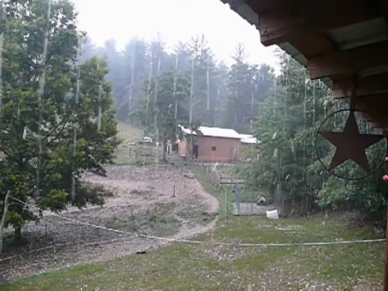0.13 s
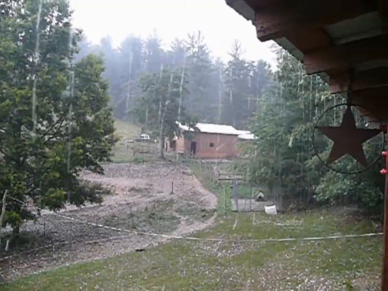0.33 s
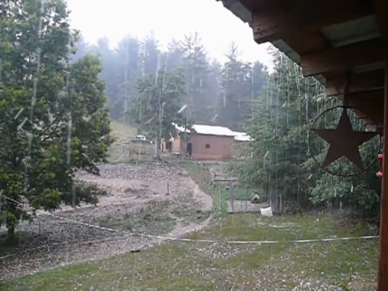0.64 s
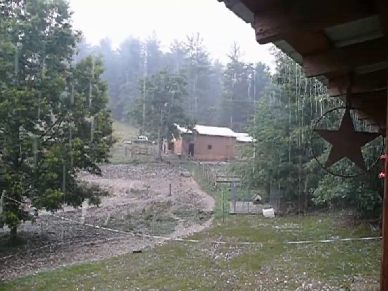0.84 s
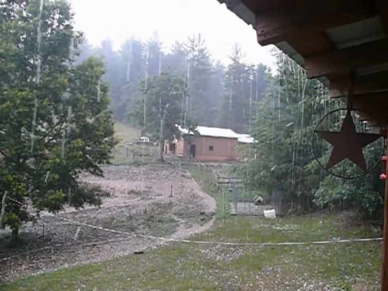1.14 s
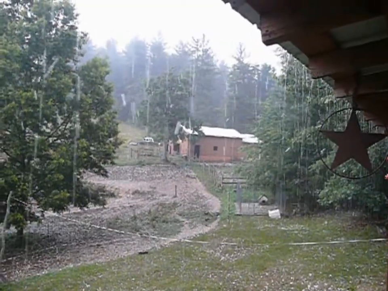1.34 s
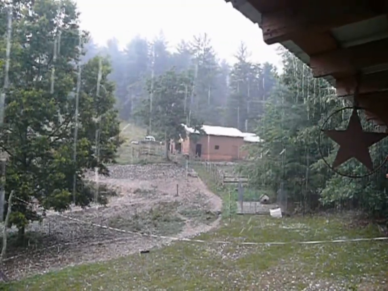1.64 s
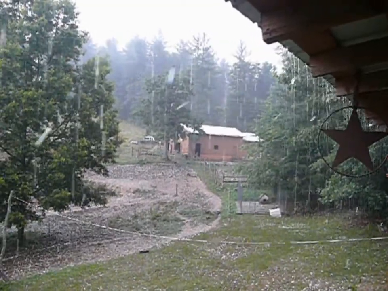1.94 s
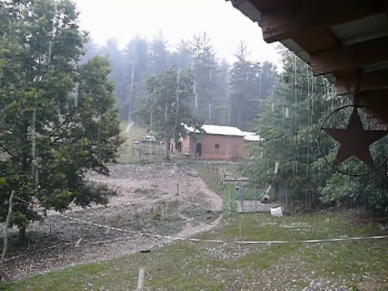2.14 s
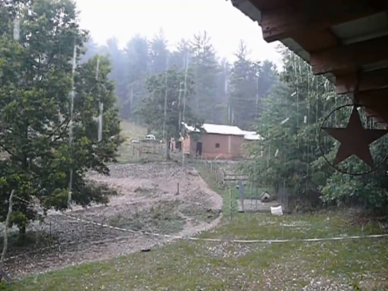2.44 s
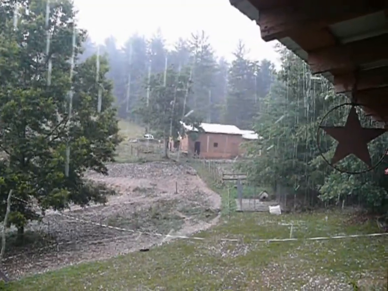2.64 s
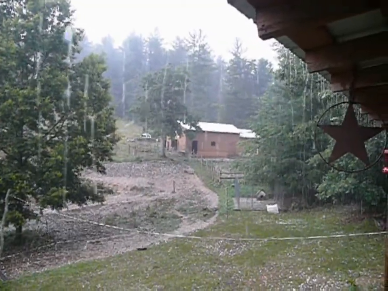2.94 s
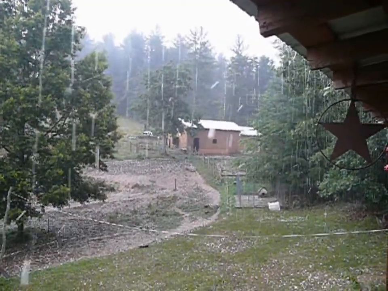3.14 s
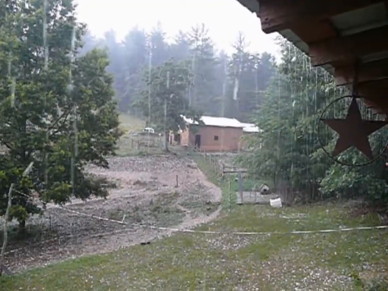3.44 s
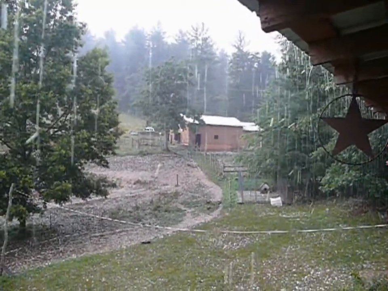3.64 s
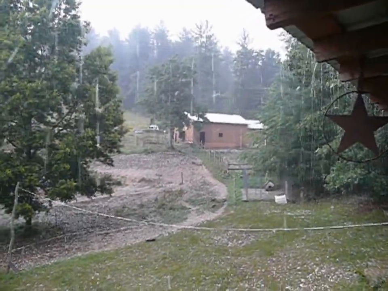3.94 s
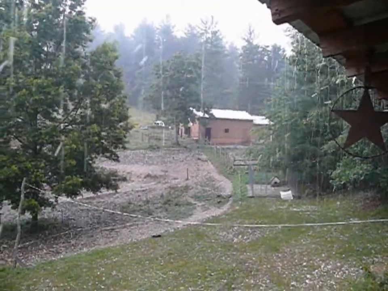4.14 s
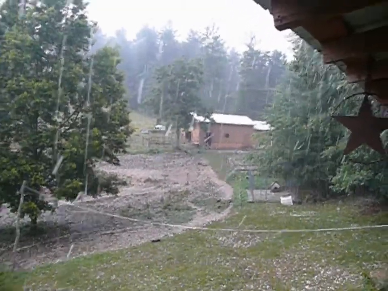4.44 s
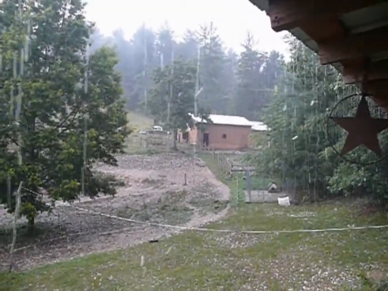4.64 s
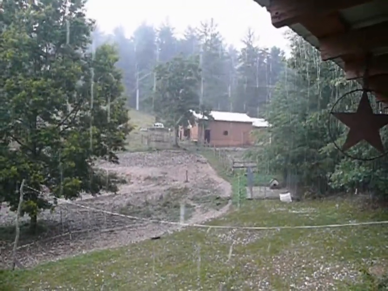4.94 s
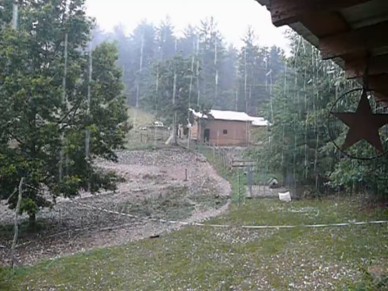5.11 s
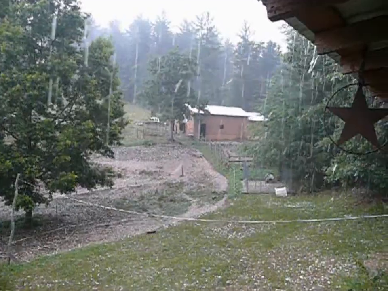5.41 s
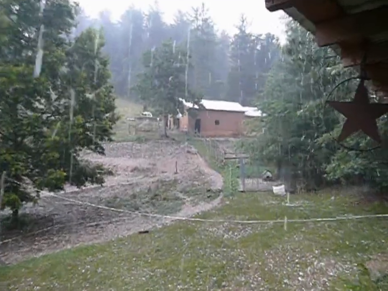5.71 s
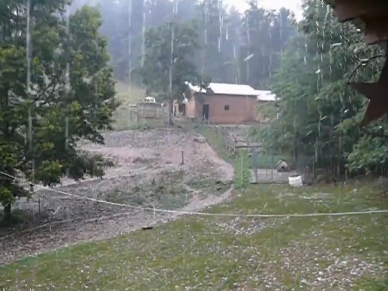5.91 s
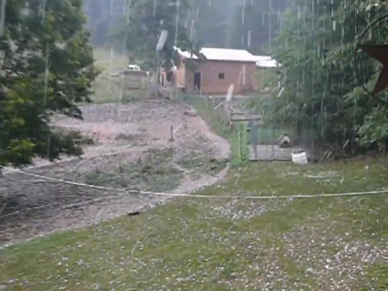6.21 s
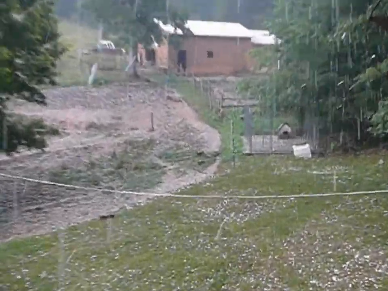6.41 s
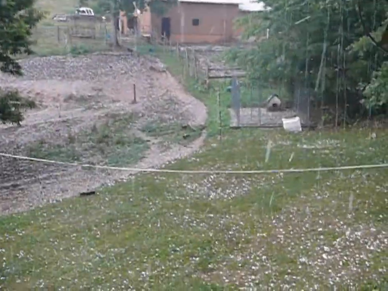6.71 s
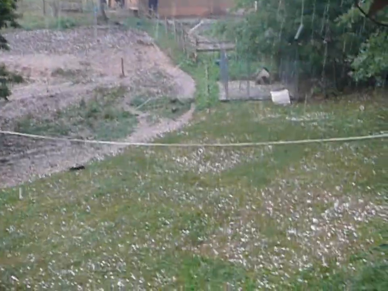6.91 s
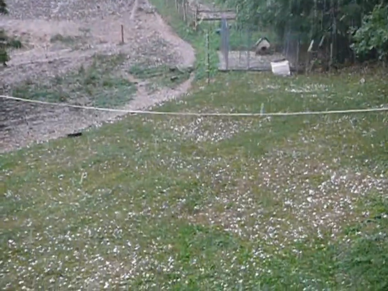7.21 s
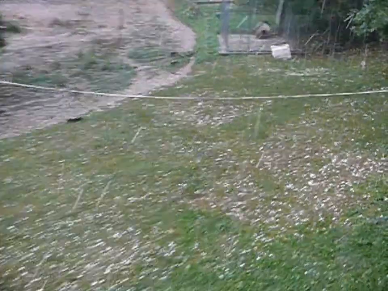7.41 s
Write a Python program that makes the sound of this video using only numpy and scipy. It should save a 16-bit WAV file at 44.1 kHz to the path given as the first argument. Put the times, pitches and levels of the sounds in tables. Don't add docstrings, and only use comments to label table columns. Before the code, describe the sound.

Large hailstones hammer a sheet-metal porch roof in a dense, irregular clatter of cracks, rattles and knocks over hissing rain, heard close and gritty.

```python
import sys
import numpy as np
from scipy import signal
from scipy.fft import rfft, irfft, next_fast_len
from scipy.io import wavfile
from scipy.ndimage import uniform_filter1d

SR = 44100
rng = np.random.default_rng(int(sys.argv[2]) if len(sys.argv) > 2 else 0)


def nominal_scale(level):
    x = np.asarray(level, float) / 20
    return 10 ** x


def pcm_store(signal):
    levels = np.round(np.clip(np.atleast_2d(signal), -1, 1) * 32767)
    wavfile.write(sys.argv[1], SR, levels.astype(np.int16).T)


N = 333396

# start_s, peak_db, ring_s
NEAR_SHEET_BLOWS = [(.288, -14, .38), (.377, -33, 0.12), (.523, -23.5, 0.34), (1.146, -10, 0.37),
                    (1.39, -27.5, 0.4), (2.539, -16.5, 0.12), (2.794, -13.5, 0.6), (3.359, -15, 0.14),
                    (3.555, -17.5, 0.93), (3.686, -13, 0.42), (4.219, -21, .25), (4.866, -23, 0.27),
                    (5.62, -17.5, 0.43), (5.835, -24.5, 0.72), (6.59, -17.5, 0.32), (6.932, -18, 0.37)]
# start_s, peak_db, ring_s
NEAR_RAFTER_BLOWS = [(.159, -27, 0.24), (.318, -13, 0.32), (.413, -8, 0.49), (.938, -24.5, 0.13),
                     (1.671, -14.5, 0.58), (2.134, -13.5, 0.39), (2.182, -27, 0.14), (2.361, -12, 0.35),
                     (2.999, -23.5, 0.36), (4.016, -12.5, .31), (4.122, -16.5, 0.48), (4.7, -20, 0.56),
                     (4.989, -24.5, 0.25), (5.537, -7, 0.26), (5.868, -17.5, 0.21), (6.074, -11.5, 0.24),
                     (6.099, -9.5, 0.18), (6.151, -17, 0.15), (6.2, -11.5, 0.32), (6.544, -25, 0.11),
                     (6.986, -17, 0.14)]
# start_s, peak_db, ring_s
FAR_SHEET_BLOWS = [(.096, -23, 0.58), (.442, -14.5, 0.42), (.909, -16, 0.34), (1.05, -20, 0.26),
                   (1.477, -17.5, 0.24), (1.741, -15.5, 0.39), (2.26, -22.5, 0.22), (2.468, -21, .65),
                   (2.868, -14.5, 0.48), (3.068, -17.5, 0.27), (3.58, -23.5, 0.21), (4.276, -23.5, 0.38),
                   (5.072, -11, 0.29), (5.161, -15.5, 0.38), (5.38, -22, 0.26), (6.005, -12.5, 0.2),
                   (6.631, -22, 0.72), (6.829, -21, 0.1), (7.16, -15, 0.26), (7.302, -15.5, 0.23),
                   (7.328, -17, 0.41), (7.359, -21, .2)]
# start_s, peak_db, ring_s
FAR_RAFTER_BLOWS = [(.071, -21, 0.13), (.143, -16.5, 0.2), (.882, -24, 0.15), (1.357, -10.5, 0.38),
                    (1.698, -13.5, 0.23), (1.785, -6, 0.095), (2.238, -13, 0.18), (2.505, -12, 0.3),
                    (2.705, -12, 0.24), (3.711, -14.5, 0.52), (4.5, -9.5, 0.37), (4.604, -19, 0.76),
                    (4.638, -15.5, 0.51), (4.92, -12.5, 0.33), (5.048, -16, 0.6), (5.246, -15, 0.9),
                    (5.682, -17, 0.41), (5.801, -9, 0.38), (6.521, -9, 0.36), (6.729, -21.5, 0.69),
                    (6.795, -8, 0.36), (7.067, -22, .41), (7.275, -16, 0.48), (7.469, -9.5, 0.17)]
# start_s, peak_db, ring_s
EAVES_BLOWS = [(.24, -17.5, 0.42), (1.327, -26, 0.17), (1.604, -24.5, 0.32), (1.854, -33.5, 0.34),
               (2.023, -22.5, 0.24), (2.107, -17, 0.18), (3.034, -24.5, 0.12), (3.19, -14.5, 0.43),
               (3.629, -14.5, 0.23), (3.864, -28, 0.13), (4.1, -33.5, 0.3), (4.419, -17, 0.35),
               (4.829, -31.5, 0.54), (5.331, -16.5, 0.19), (5.468, -16, 0.21), (5.702, -15, 0.26),
               (5.754, -17.5, .43), (5.928, -26, 0.73), (6.474, -17, 0.12), (7.138, -32, 0.26)]
# start_s, peak_db, ring_s
WIDE_PANEL_BLOWS = [
    (2.563, -14, 0.17),
    (2.592, -13.5, 0.26),
    (3.344, -17.5, .27),
    (3.388, -24.5, 0.19),
    (4.297, -18, 0.3),
    (7.039, -32.5, 0.54),
    (7.534, -13, .48),
]
# frequency_hz, density_db (per Hz)
ROOF_SPECTRUM = [(35, -48), (60, -37), (226, -16.5), (265, -13), (518, -11), (587, -13.5), (1010, -3),
                 (1610, -6), (2330, -4.5), (2640, -7.5), (3260, -5), (3560, -4), (4100, -13), (5330, -52),
                 (9020, -120)]
# frequency_hz, share (of the blow's ring_s)
RING_SHARE = [
    (100, 2.1),
    (400, 0.8),
    (1000, 1.07),
    (2000, .95),
    (3800, 0.83),
]
# start_s, peak_db, pitch_hz
OVERHEAD_KNOCKS = [(0.24, -21, 2340), (0.288, -8, 2260), (0.318, -17, 1037), (0.413, -18, 940),
                   (1.608, -27, 2580), (1.671, -21, 1510), (2.109, -15, 1800), (2.361, -15, 1880),
                   (2.795, -12, 1450), (4.504, -16.5, 2454), (3.188, -13.5, 1800), (3.344, -16, 1195),
                   (3.63, -13, 1350), (3.686, -7, 2033), (3.711, -10, 1028), (4.015, -10, 2500),
                   (4.122, -18, 2290), (4.419, -20, 1107), (4.7, -4.5, 2560), (5.538, -8.5, 1775),
                   (5.753, -9.5, 3085), (6.076, -12.5, 1697), (6.2, -14.5, 1097), (6.521, -13, 1058),
                   (6.73, -9, 2320), (7.535, -19, 3070)]
# start_s, peak_db, pitch_hz
HEAVIEST_KNOCK = [
    (1.1464, 1.5, 880),
]
# centre_s, depth_db
LOW_DIPS = [
    (.2955, -33),
    (.4162, -28),
    (1.1505, -18),
    (2.115, -32),
    (3.26, -37),
    (3.695, -31),
    (4.0185, -39),
    (4.703, -24),
    (6.0765, -28),
]
# start_s, level_db
PATTER_LEVEL = [(0.0, -31.5), (0.12, -36.5), (0.35, -28), (0.55, -38), (0.85, -34), (2.06, -32),
                (2.72, -29.5), (3.33, -33), (3.7, -30.5), (3.83, -40.5), (4.1, -33.5), (4.57, -32),
                (5.0, -34), (5.582, -29), (5.69, -34.5), (6.08, -27), (6.3, -31.5), (7.56, -30)]
# frequency_hz, density_db (per Hz)
LAWN_SPECTRUM = [(35, -57.5), (60, -26), (260, -6.5), (576, -7.5), (997, -1.5), (1550, -3), (2290, -3),
                 (2640, -5), (3380, -2), (4100, -9.5), (5330, -48), (9020, -120)]

SHEET_BASS_DB, RAFTER_BASS_DB, EAVES_BASS_DB, WIDE_BASS_DB = 5, -4, 0, 10
SHEET_TREBLE_DB, RAFTER_TREBLE_DB, EAVES_TREBLE_DB = 1.8, -0.85, 5.5
NEAR_CRACK_DB, FAR_CRACK_DB, EAVES_CRACK_DB, WIDE_CRACK_DB = 6, -4.5, 2.5, -1.2
USUAL_DB, DULLER = -17, 0.34
KNOCK_T60_S, RING_T60_S, RING_UNDER_DB = 0.017, 0.17, -19.5
BEND, BEND_S = 0.28, 0.0023
CAMERA_HZ, TOP_HZ = 8000, 15760
CLIP, STEP, OFFSET = 0.29, 0.005316, 0.0139


def stones():
    spots = [(NEAR_SHEET_BLOWS, SHEET_BASS_DB, SHEET_TREBLE_DB, NEAR_CRACK_DB),
             (NEAR_RAFTER_BLOWS, RAFTER_BASS_DB, RAFTER_TREBLE_DB, NEAR_CRACK_DB),
             (FAR_SHEET_BLOWS, SHEET_BASS_DB, SHEET_TREBLE_DB, FAR_CRACK_DB),
             (FAR_RAFTER_BLOWS, RAFTER_BASS_DB, RAFTER_TREBLE_DB, FAR_CRACK_DB),
             (EAVES_BLOWS, EAVES_BASS_DB, EAVES_TREBLE_DB, EAVES_CRACK_DB),
             (WIDE_PANEL_BLOWS, WIDE_BASS_DB, SHEET_TREBLE_DB, WIDE_CRACK_DB)]
    out = np.zeros(N + SR)
    length = SR * 2 // 5
    for blows, bass_db, treble_db, crack_db in spots:
        for start_s, peak_db, ring_s in blows:
            high_db = treble_db - DULLER * (peak_db - USUAL_DB)
            blow = panel(bass_db, high_db, np.clip(ring_s, 0.05, 0.7), crack_db, length)
            out[round(start_s * SR):][:length] += nominal_scale(peak_db) * blow
    return nominal_scale(5) * coloured(out[:N], ROOF_SPECTRUM)


def panel(low_db, high_db, ring_s, crack_db, length):
    t = np.arange(length) / SR
    hz, frame_s, z = signal.stft(rng.standard_normal((2, length)), SR, nperseg=256)
    tilt_db = along([(120, 0.56 * low_db), (400, low_db), (1200, 0.0035), (3000, high_db)], hz)[:, None]
    modes_db = 2.2 * patches(z[0].shape, bins=3, frames=12)
    rattle_db = 1.4 * patches(z[0].shape, bins=12, frames=1)
    fade_db = -60 * frame_s / (ring_s * along(RING_SHARE, hz)[:, None])
    wash_db = modes_db + rattle_db + fade_db
    gains = nominal_scale(tilt_db + np.array([wash_db, 0 * fade_db]))
    wash, snap = signal.istft(z * gains, SR, nperseg=256)[1][:, :length]
    build = 1 - np.exp(-t / (0.0031 * nominal_scale(-crack_db)))
    crack = nominal_scale(crack_db - 1.5 - 60 * t / 0.019) * snap
    return wash * build + crack


def overhead():
    out = np.zeros(N + SR)
    t = np.arange(SR // 5) / SR
    knocks = OVERHEAD_KNOCKS + HEAVIEST_KNOCK
    spots = rng.standard_normal((len(knocks), 2, 6, 1))
    rising = t - BEND * BEND_S * (1 - np.exp(-t / BEND_S))
    attack = 1 - np.exp(-t / 0.00022)
    for row, (detune, size) in zip(knocks, spots):
        start_s, peak_db, pitch_hz = row
        knock = nominal_scale(-60 * t / KNOCK_T60_S) * np.sin(2 * np.pi * pitch_hz * rising)
        mode_hz = pitch_hz * np.exp(0.13 * detune)
        modes = nominal_scale(3 * size) * np.sin(2 * np.pi * mode_hz * t + size)
        ring = nominal_scale(RING_UNDER_DB - 60 * t / RING_T60_S) * modes.sum(axis=0)
        ring = ring * (row not in HEAVIEST_KNOCK)
        out[round(start_s * SR):][:len(t)] += nominal_scale(peak_db - 3.5) * attack * (knock + ring)
    return out[:N]


def low_dips():
    t = np.arange(N) / SR
    out = np.zeros(N)
    for start_s, depth_db in LOW_DIPS:
        out -= nominal_scale(depth_db) * np.exp(-((t - start_s) / 0.0012) ** 2)
    return signal.lfilter(*signal.butter(1, 30, "high", fs=SR), out)


def patter():
    start_s, level_db = np.transpose(PATTER_LEVEL)
    pellets = nominal_scale(-1.5) * showers(per_s=110, spread_db=9.5, t60=0.12)
    drops = nominal_scale(-4.0) * showers(per_s=510, spread_db=10, t60=0.0086)
    z = signal.stft(rng.standard_normal(N), nperseg=512)[2]
    uneven = nominal_scale(2.2 * patches(z.shape, bins=5, frames=10))
    rain = unit(signal.istft(z * uneven, nperseg=512)[1][:N])
    swell = nominal_scale(np.interp(np.arange(N) / SR, start_s, level_db) - 3.0)
    return swell * unit(coloured(rain + pellets + drops, LAWN_SPECTRUM))


def showers(per_s, spread_db, t60):
    hits = rng.random((round(per_s * N / SR), 2))
    energy = np.bincount((hits[:, 0] * N).astype(int), nominal_scale(2 * spread_db * hits[:, 1]), N)
    decay = nominal_scale(-2 * 60 * np.arange(SR // 4) / SR / t60)
    tails = signal.fftconvolve(energy, decay)[:N]
    return unit(np.sqrt(np.abs(tails)) * rng.standard_normal(N))


def patches(shape, bins, frames):
    field = uniform_filter1d(rng.standard_normal(shape), size=bins, axis=-2)
    field = uniform_filter1d(field, size=frames, axis=-1)
    return field / field.std()


def coloured(x, spectrum):
    m = 2 * next_fast_len(len(x) // 2 + 4096)
    gain = nominal_scale(along(spectrum, np.fft.rfftfreq(m, 1 / SR)))
    cepstrum = irfft(np.log(gain + 1e-4), m)
    cepstrum[1:m // 2] *= 2
    cepstrum[m // 2 + 1:] = 0
    return irfft(rfft(x, m) * np.exp(rfft(cepstrum)), m)[:len(x)]


def along(points, hz):
    f, v = np.transpose(points)
    return np.interp(np.log(hz + 1), np.log(f + 1), v)


def unit(x):
    return x / np.sqrt(np.mean(x ** 2, axis=-1, keepdims=True) + 1e-20)


def scene():
    return (stones() + overhead() + low_dips() + patter())[None]


def roll_off(x):
    return signal.sosfilt(signal.butter(12, 15880, fs=SR, output="sos"), x)


def record(dry):
    clipped = dry[0] / (1 + np.abs(dry[0] / CLIP) ** 8) ** (1 / 8) - OFFSET
    slow = signal.resample_poly(clipped, 80, 441)
    slow = np.pad(slow, (1, 3), mode="edge")
    slow = STEP * np.round(slow / STEP)
    place = np.arange(N) * CAMERA_HZ / SR
    k = place.astype(int)
    u = place - k
    weights = [-u * (u - 1) * (u - 2) / 6,
               (u + 1) * (u - 1) * (u - 2) / 2,
               -(u + 1) * u * (u - 2) / 2,
               (u + 1) * u * (u - 1) / 6]
    smooth = sum(w * slow[k + j] for j, w in enumerate(weights))
    edge = signal.firwin(601, TOP_HZ, fs=SR, window=("kaiser", 7))
    smooth = signal.fftconvolve(np.pad(smooth, 300, mode="edge"), edge, mode="valid")
    return roll_off(smooth[None])


dry = scene()
out = record(dry)
pcm_store(out)
```